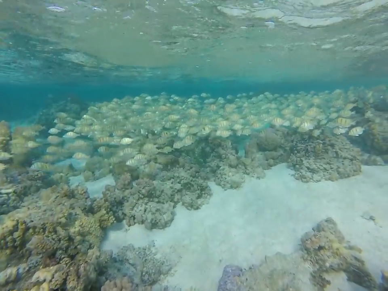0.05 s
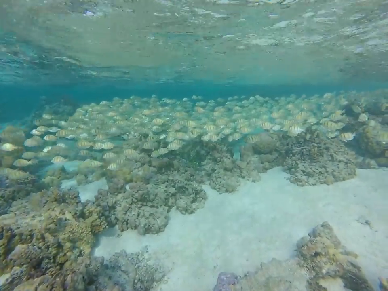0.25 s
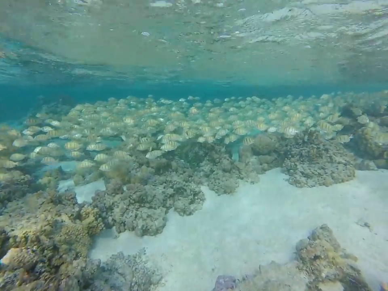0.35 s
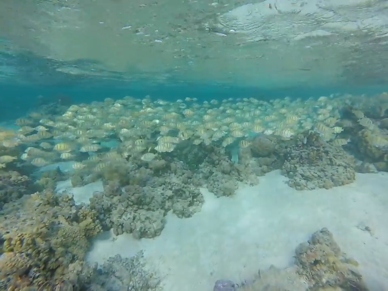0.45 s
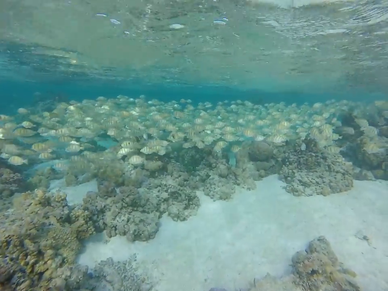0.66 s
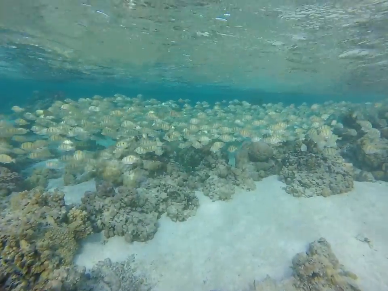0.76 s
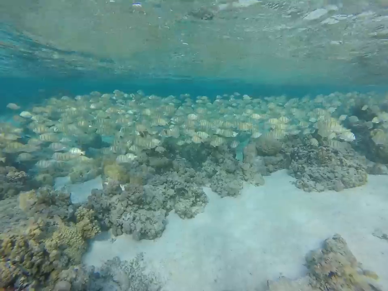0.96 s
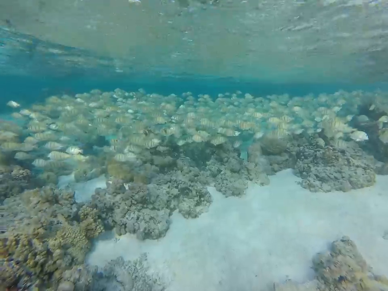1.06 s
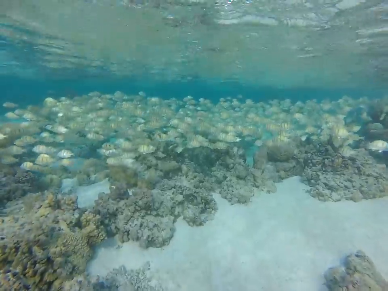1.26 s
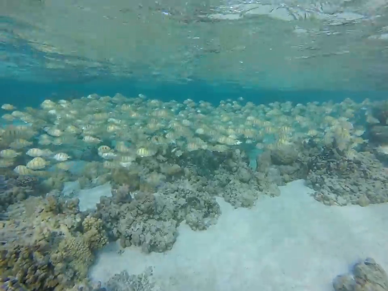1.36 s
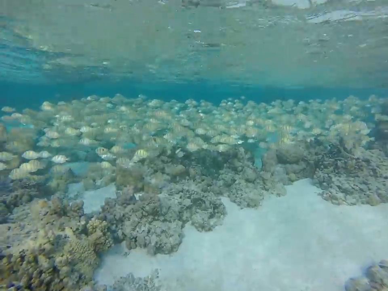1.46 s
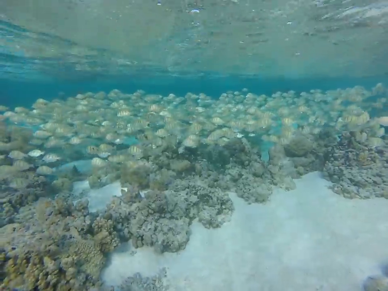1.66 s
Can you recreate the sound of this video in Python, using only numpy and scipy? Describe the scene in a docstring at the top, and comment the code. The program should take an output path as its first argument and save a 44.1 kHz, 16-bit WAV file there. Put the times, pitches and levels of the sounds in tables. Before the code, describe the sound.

Moving water rumbles and rushes softly, heard from a waterproof camera drifting over a shallow reef. A dull knock hits the housing, the water swells with small bubbles, then a second knock lands. Faint ticks crackle throughout.

```python
"""Drifting over a shallow reef

A camera in a waterproof housing drifts under the surface, in the rumble and hiss of the sea.
Moving water swells into a soft rush, coloured by the housing, with small bubbles and a low gurgle.
Two dull knocks with rebounds hit the housing. Sharp ticks, likely snapping shrimp, crackle all around."""
import sys
import numpy as np
from scipy import signal
from scipy.fft import rfft, irfft
from scipy.io import wavfile

SR = 44100
rng = np.random.default_rng(int(sys.argv[2]) if len(sys.argv) > 2 else 0)


def store_pcm(level_fs):
    """Save levels as 16-bit WAV."""
    pcm = np.round(np.clip(level_fs, -1, 1) * 32767).astype(np.int16)
    wavfile.write(sys.argv[1], SR, np.atleast_2d(pcm).T)


N = 74970
TIME = np.arange(N) / SR

# How strongly the water flows: time_s, level_db
FLOW_STRENGTH = [(0, -72), (.58, -67.5), (.725, -54.5), (.75, -41.5), (.80, -43.5), (.85, -38.5),
                 (.95, -43.5), (1.07, -49), (1.21, -42.5), (1.31, -42.5), (1.37, -43.5), (1.43, -46),
                 (1.5, -51), (1.58, -47), (1.7, -57.5)]


def from_db(db):
    """Turn decibels into a number to multiply by."""
    return 10 ** (np.asarray(db) / 20)


def rms_one(x):
    """Scale a signal so its average strength (rms) is 1."""
    return x / np.sqrt(np.mean(x ** 2) + 1e-20)


def cut(x, hz, kind, order=2):
    """Keep the "low" or "high" side of hz; a higher order cuts more steeply."""
    return signal.sosfilt(signal.butter(order, hz, kind, fs=SR, output="sos"), x + 1e-18)


def drift(rate_hz):
    """A smooth random wander, about 1 in size."""
    return rms_one(cut(rng.standard_normal(N + SR), rate_hz, "low")[SR:])


def since(start_s):
    """Seconds since an event, zero before it."""
    return np.maximum(TIME - start_s, 0)


def fade(t, fade_s):
    """Die away, dropping 60 dB every fade_s seconds."""
    return np.exp(-np.log(1000) * t / fade_s)


def ring(t, pitch_hz, fade_s):
    """The fading tone of something struck."""
    return np.sin(2 * np.pi * pitch_hz * t) * fade(t, fade_s)


def clicks(per_s, spread_db):
    """Random clicks of uneven size and sign."""
    sizes = from_db(spread_db * np.minimum(rng.exponential(1, N), 4))
    return (rng.random(N) < per_s / SR) * sizes * rng.choice([-1, 1], N)


def sea(level_db=-53, flutter_db=0.4):
    """Open water makes a steady rumble and hiss."""
    # The sea's balance from low to high: frequency_hz, relative_db
    sea_spectrum = [(20, 3), (35, 1), (65, -13.5), (105, -10), (200, -15), (430, -19.5), (660, -19.5),
                    (950, -25), (2600, -30.5), (5000, -36), (8000, -43.5), (13000, -50), (16000, -55)]
    hz, db = np.transpose(sea_spectrum)
    bins_hz = np.maximum(np.arange(N // 2 + 1) * SR / N, 1)
    colour = from_db(np.interp(np.log(bins_hz), np.log(hz), db))
    noise = irfft(rfft(rng.standard_normal(N)) * colour, N)
    noise = cut(noise, 22.1, "high")
    return rms_one(noise) * from_db(level_db + flutter_db * drift(rate_hz=20))


def shrimp(crackle_db=-73.5, attack_s=0.0003):
    """Near snaps and a crackle of far ones, each smeared by bouncing off the reef and the surface."""
    # Nearby snaps: start_s, relative_db, low_edge_hz
    snaps = [(0.021, -46, 3830), (0.403, -44.5, 5500), (0.429, -47, 4900), (0.4415, -38.5, 3310),
             (.542, -48, 2830), (0.59, -47, 7000), (0.608, -47.5, 3000), (0.724, -46, 3320),
             (0.7408, -42.5, 4270), (0.897, -52, 4000), (0.936, -47, 6000), (.948, -51, 6000),
             (1.099, -30.5, 3900), (1.137, -44.5, 6960), (1.174, -50, 7000), (1.352, -46.5, 3130),
             (1.415, -44, 7000), (1.4562, -42.5, 4000), (1.695, -49, 3480)]
    near = np.zeros(N)
    for start_s, db, low_edge_hz in snaps:
        t = since(start_s)
        burst = rng.standard_normal(N) * fade(t, fade_s=0.017) * (1 - np.exp(-t / attack_s))
        near += from_db(db) * cut(burst, low_edge_hz, "high", order=3)
    # Each far click gets a short tail of noise.
    far_clicks = clicks(per_s=470, spread_db=3.2)
    power = signal.fftconvolve(far_clicks ** 2, fade(TIME, fade_s=0.004) ** 2)[:N]
    far = cut(np.sqrt(np.abs(power)) * rng.standard_normal(N), 2907, "high")
    dulled = cut(near + from_db(crackle_db) * rms_one(far), 8800, "low")
    return cut(dulled, 13500, "low", order=6)


def bubbles(rise_per_s=1.2, attack_s=0.0012, wobble_rad=0.9):
    """Small bubbles pop with a brief, rough ring that rises a little in pitch."""
    # Single bubbles: start_s, pitch_hz, level_db
    pops = [(.029, 626, -29.5), (.030, 1840, -37), (.031, 1270, -43), (.211, 3580, -47),
            (0.5413, 2626, -39.5), (.5425, 3400, -43.5), (.609, 1380, -42.5), (.610, 3500, -46),
            (.650, 2150, -51), (0.67, 1630, -42.5), (0.69, 1440, -40.5), (0.778, 2850, -42.5),
            (0.811, 2420, -41), (.898, 2630, -37.5), (0.898, 3930, -43), (1.088, 2850, -41),
            (1.138, 690, -29.5), (1.201, 2220, -36), (1.236, 2330, -40), (1.262, 2210, -45),
            (1.359, 893, -27), (1.445, 2595, -38.5), (1.511, 2900, -42.5), (1.514, 1413, -34),
            (1.557, 2550, -36), (1.670, 1426, -35.5)]
    out = np.zeros(N)
    for start_s, pitch_hz, level_db in pops:
        t = since(start_s)
        wobble = wobble_rad * drift(rate_hz=0.11 * pitch_hz)
        tone = np.sin(2 * np.pi * pitch_hz * t * (1 + rise_per_s * t / 2) + wobble)
        out += from_db(level_db) * tone * fade(t, fade_s=0.031) * (1 - np.exp(-t / attack_s))
    return out


def knocks(boost_db=10.5, boost_octaves=0.11, leak_db=-30.5):
    """Each soft hit rings the housing, most near the hit's treble cut-off, and adds a low thump."""
    # Hits and their rebounds: start_s, peak_db, cutoff_hz, thump_hz, thump_relative_db, thump_fade_s
    hits = [(0.2427, .5, 832, 232.5, -13.5, 0.071), (0.2493, -12.5, 900, 267, -18, 0.13),
            (0.2714, -8, 1250, 203, -18, 0.13), (1.4344, 1, 1081, 333, -9, 0.051),
            (1.4464, -9.5, 972, 264, -16, 0.039), (1.4680, -16.5, 2260, 226, -16, .05)]
    # The tones the housing rings with: pitch_hz, relative_db, fade_s
    housing_tones = [(101.2, -26, 0.082), (195, -55, .07), (447, -6.5, 0.0094), (613, -2.5, 0.023),
                     (874.2, -1, 0.015), (1080, -11.5, 0.027), (1299, -16.5, 0.023), (1622, -14.5, 0.03),
                     (2210, -27, .04)]
    out = np.zeros(N)
    for start_s, peak_db, cutoff_hz, thump_hz, thump_db, thump_fade_s in hits:
        t = since(start_s)
        blow = -from_db(thump_db) * ring(t, thump_hz, thump_fade_s)
        for pitch_hz, db, fade_s in housing_tones:
            nearness = np.exp(-(np.log2(pitch_hz / cutoff_hz) / boost_octaves) ** 2)
            sign = 1 if pitch_hz > 780 else -1  # low tones start by swinging the other way
            blow += sign * from_db(db + boost_db * nearness) * ring(t, pitch_hz, fade_s)
        dull = cut(blow, cutoff_hz, "low", order=6)
        brighter_leak = from_db(leak_db) * cut(blow, 2 * cutoff_hz, "low", order=6)
        knock = cut(dull + brighter_leak, 113.4, "high", order=3)
        out += from_db(peak_db) * knock / np.abs(knock).max()
    return out


def rush(relative_db=-0.5, flutter_db=3.5):
    """Thousands of tiny splashes swell with the flow and make the housing ring."""
    # The housing's resonances, stirred by the flow: pitch_hz, width_hz, relative_db
    resonances = [(632.4, 37, 1.5), (684, 70, -1), (789, 28, -2.5), (838, 48, -6.5), (981, 37, -12.5),
                  (1270, 48, -20), (1441, 120, -15), (1800, 85, -26.5), (2650, 340, -25.5)]
    out = np.zeros(N)
    for pitch_hz, width_hz, db in resonances:
        splashes = clicks(per_s=3500, spread_db=1.5) * from_db(flutter_db * drift(rate_hz=25))
        # This filter lets through one narrow band around the pitch.
        decay = np.exp(-np.pi * width_hz / SR)
        feed_in = np.array([1, 0, -1]) * (1 - decay ** 2) / 2
        feedback = [1, -2 * decay * np.cos(2 * np.pi * pitch_hz / SR), decay ** 2]
        out += from_db(db) * signal.lfilter(feed_in, feedback, splashes)
    out = cut(out, 540, "high", order=8)
    out = cut(out, 3200, "low")
    return rms_one(out) * from_db(relative_db + np.interp(TIME, *np.transpose(FLOW_STRENGTH)))


def fizz(relative_db=-11, low_hz=1215, high_hz=3390, pitch_count=20, db_per_octave=-12):
    """The flow carries a trickle of tiny bubbles, each with a short ring."""
    out = np.zeros(N)
    for pitch_hz in np.geomspace(low_hz, high_hz, pitch_count):
        starts = clicks(per_s=350 / pitch_count, spread_db=4)
        pop = ring(TIME[:SR // 20], pitch_hz, fade_s=46 / pitch_hz)  # fades over 46 vibrations
        gain = from_db(db_per_octave * np.log2(pitch_hz / low_hz))
        out += gain * signal.fftconvolve(starts, pop)[:N]
    return rms_one(out) * from_db(relative_db + np.interp(TIME, *np.transpose(FLOW_STRENGTH)))


def gurgles(rise_hz_per_s=540, wobble_rad=0.4):
    """Larger pockets of air swell and fade as low rising tones."""
    # Pockets of air: middle_s, half_length_s, pitch_hz, level_db
    air_pockets = [(.70, 0.015, 159, -57), (.88, 0.082, 160, -54), (1.0, 0.036, 172, -53),
                   (1.275, 0.037, 189, -43)]
    out = np.zeros(N)
    for middle_s, half_length_s, pitch_hz, level_db in air_pockets:
        t = TIME - middle_s
        wobble = wobble_rad * drift(rate_hz=25)
        tone = np.sin(2 * np.pi * t * (pitch_hz + rise_hz_per_s * t / 2) + wobble)
        out += from_db(level_db) * tone * np.exp(-(t / half_length_s) ** 2)
    return out


def scene():
    """Everything reaches one microphone inside the housing."""
    return (sea() + shrimp() + bubbles() + knocks() + rush() + fizz() + gurgles())[None]


def record(dry, top_hz=15900):
    """The hardest knocks just overload, and the highest treble is cut away."""
    clipped = np.clip(dry, -1, 1)
    return signal.sosfilt(signal.cheby2(16, 60, top_hz, fs=SR, output="sos"), clipped)


dry = scene()
out = record(dry)
store_pcm(out)
```